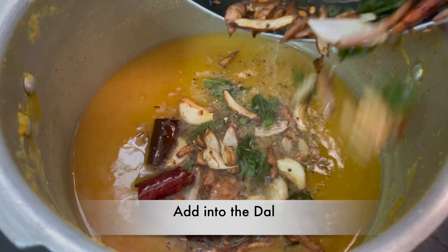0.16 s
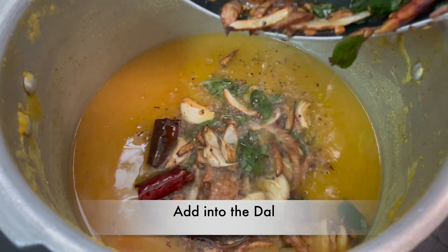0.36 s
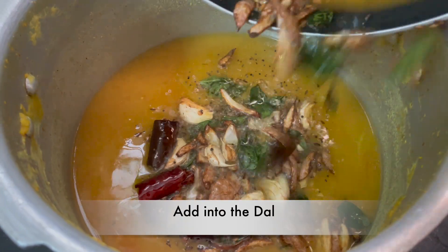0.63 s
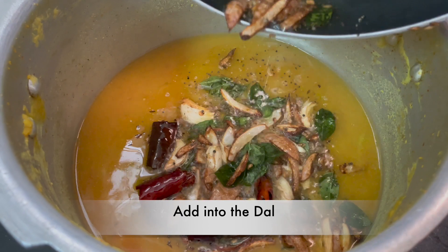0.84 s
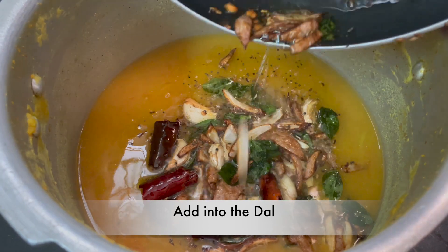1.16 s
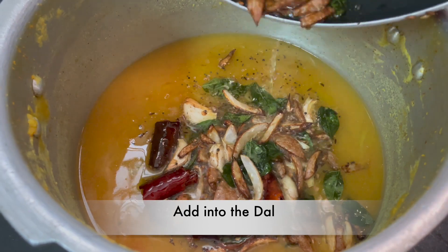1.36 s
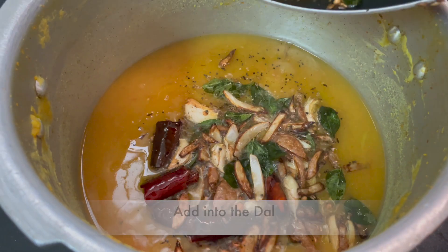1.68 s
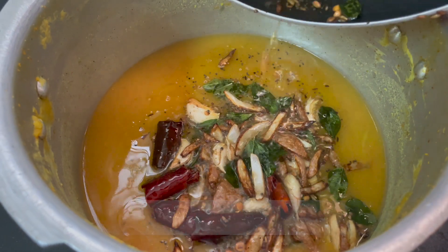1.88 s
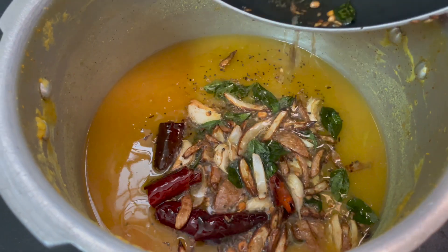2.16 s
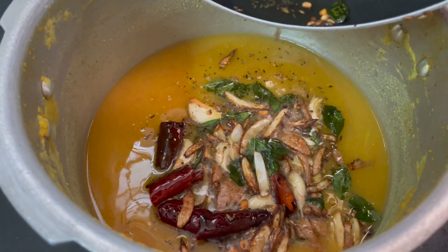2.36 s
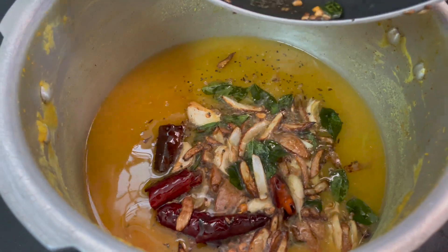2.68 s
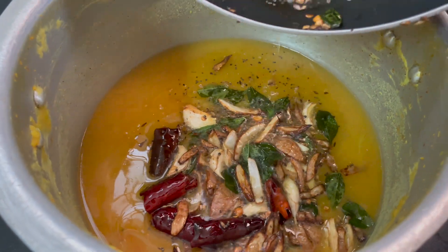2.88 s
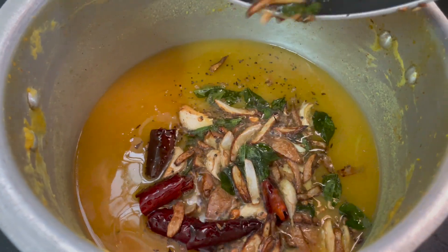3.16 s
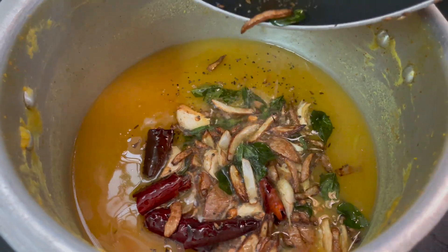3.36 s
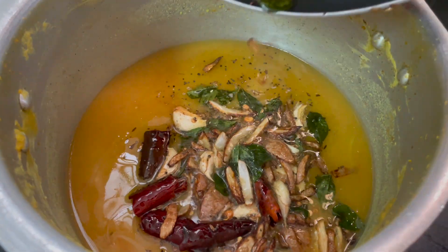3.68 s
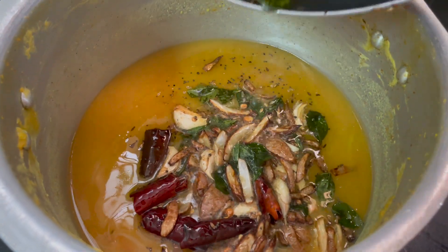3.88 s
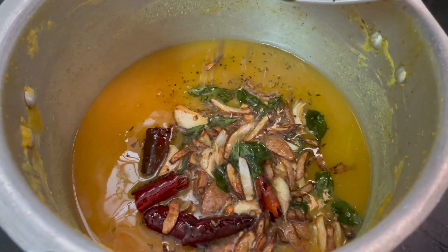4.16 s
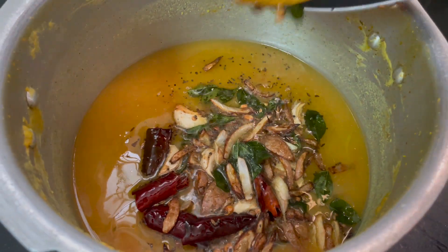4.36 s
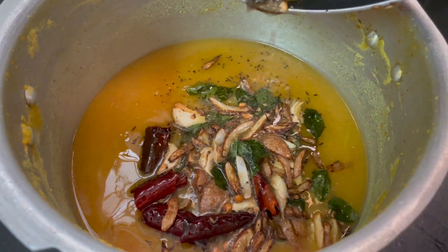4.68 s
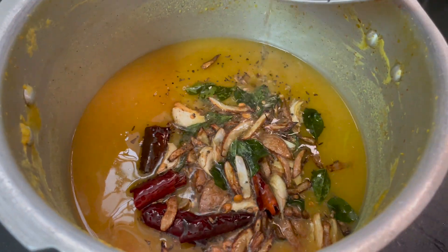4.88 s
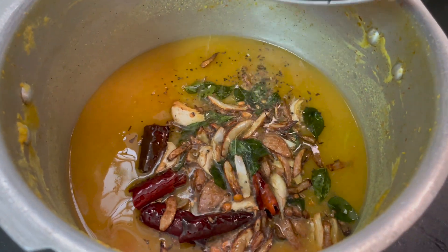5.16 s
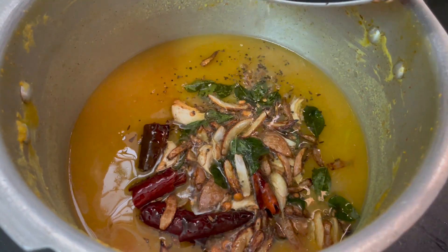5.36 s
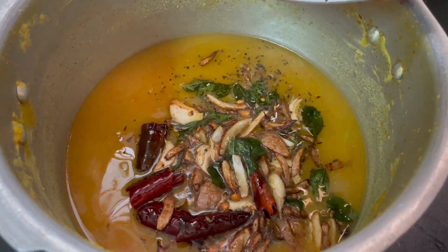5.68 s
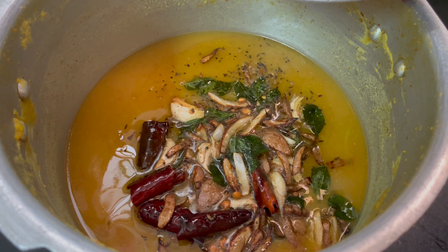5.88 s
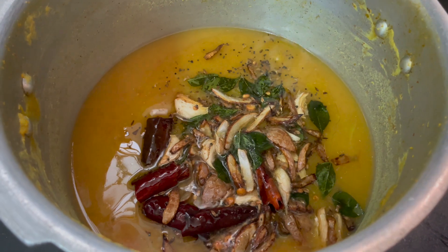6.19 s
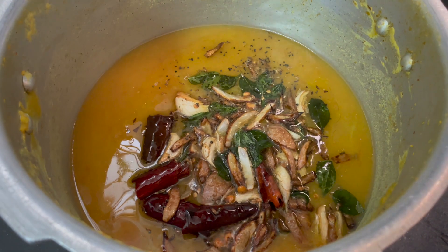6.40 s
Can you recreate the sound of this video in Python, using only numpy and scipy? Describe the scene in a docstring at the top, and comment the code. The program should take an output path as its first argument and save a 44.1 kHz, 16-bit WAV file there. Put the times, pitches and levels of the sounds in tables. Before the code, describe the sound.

Close stereo in a small kitchen with a quiet low rumble. At 0 s hot oil and spices hit soup in a metal pot: a dense, bright, wet sizzle with a bubbling plop, strongest around 0.2 s. Spoon knocks on a small pan come at 0.3, 0.8, 1.2 and 1.35 s, fairly dull and damped; a short scraped ring sounds near 0.65 s. The pouring stops about 1.7 s and the hiss thins to crackle. A softer knock falls at 1.9 s; plops and sputtering flare around 2.4-2.9 s. A hard, bright clack comes at 3.25 s, then knocks at 3.85, 4.2, 4.55, 4.8, 5.2 and 5.5 s, increasingly bright and ringing but short. Tiny sharp oil pops and light taps are scattered between. A small hiss flare rises near 5.1 s; by 6 s only weak crackle and faint taps remain until 6.5 s.

```python
"""Hot spiced oil into soup

Hot oil with fried spices is scraped from a small pan into a metal pot of lentil soup in a kitchen.
Bursting steam bubbles, drawn as filtered random clicks, sizzle densely, thin to a crackle and ring the pot's air.
A spoon knocks on the pan: damped modes plus noise, brighter as the pan empties.
Bubbling plops, and one short scraped ring of the pan near 0.65 s, are rising damped tones with noise;
light taps are short modes with a crack, oil pops short shaped bursts."""
import sys
import numpy as np
from scipy import signal
from scipy.fft import rfft, irfft, next_fast_len
from scipy.io import wavfile

SR = 44100
rng = np.random.default_rng(int(sys.argv[2]) if len(sys.argv) > 2 else 0)


def transcribe(u):
    """Save the signal u as a 16-bit wav file named by the first command-line argument.

    u: samples, shape (n,) or (channels, n), limited to [-1, 1]; the rate is SR.
    q: integer samples, one column per channel.
    """
    v = np.clip(np.atleast_2d(u).T, -1, 1)
    q = np.round(v * 32767).astype(np.int16)
    wavfile.write(sys.argv[1], SR, q)


N = 287973
TIME_S = np.arange(N) / SR

# Frying strength as the oil cools. Each row: time in seconds, level of the hiss in dB.
FRY_HEAT = [(0.0, -23.5), (0.16, -21), (0.5, -26.5), (0.84, -28.5), (1.14, -29.5), (1.52, -32.5),
            (1.55, -38), (1.8, -33.5), (2.07, -37), (2.38, -38), (2.68, -40), (2.86, -38), (3.35, -37),
            (4.13, -42), (4.47, -39.5), (4.6, -44), (4.84, -41.5), (5.13, -36.5), (6.07, -51.5),
            (6.53, -50.5)]
# Spoon blows on the pan. Each row: start in seconds, then in dB: blow, thud, ring, rim modes, base mode,
# edge modes, top modes, hollow, rebound.
SPOON_KNOCKS = [(0.3038, -11.5, -12, -34, 11, 9, 0, 8, 0, -12),
                (0.828, -11, -12.5, -9.5, 3.5, 11.5, 1, 11, 4, -37),
                (1.2179, -11, -13.5, -6, 5, 10, -2, 10.5, -9, -1),
                (1.343, -10.5, -30, -4.5, 2, 0, -1, -5, -8, -11),
                (1.9151, -20, -2.5, -2, 7.5, 7.5, -1, 12.5, 3.5, -10),
                (3.2601, -4.5, -18, -10, 6.5, 3.5, 3, 1, -26, -1),
                (3.8505, -10.5, -10.5, -5, 5.5, 10.5, -4.5, 2.5, -2, -33),
                (4.1834, -16, -3.5, -22, 4, 0, 5, -14, -14, -14),
                (4.569, -10, -0.5, 3.5, -11, -1, -1, -9, 3, -10),
                (4.8074, -9, -3.5, -17.5, 6, 1, 8, 2.5, -7, -1),
                (5.1822, -7, -1.5, 1.5, -16.5, -1, -4.5, 4, 2, -13),
                (5.5277, -5, -1, 2.5, -16, -5, -9, 2, 1, -17)]
# Ringing modes of the pan, before hand and oil smother them. Each row: frequency in Hz, level in dB, t60 in seconds.
PAN_MODES = [(192.6, -33.5, 0.42), (481.6, -20.5, 0.37), (583, -17, 0.32), (717, -21, 0.37),
             (887, -33, 0.11), (1190, -25, 0.16), (1360, -39, 0.077), (1830, -31, 0.15),
             (1042, -14.5, 0.22), (1645, -22, 0.17), (2175, -8, 0.2), (1970, -20, 0.068),
             (2490, -13.5, 0.13), (2530, -21, 0.087), (2836, -12.5, 0.081), (3395, -16.5, 0.047),
             (3680, -28.5, 0.055), (4800, -38, 0.069), (5400, -23, 0.053), (5970, -28, 0.07)]
# Quickly damped modes of spoon and rim. Each row: frequency in Hz, level in dB, t60 in seconds.
CLACK_MODES = [(588, -11, 0.019), (770, -8, 0.037), (1066, -12, 0.044), (1230, -11, 0.019),
               (1650, 1.5, 0.0078), (2006, -9, 0.0073), (2240, -14, 0.02), (2610, -5, 0.0042),
               (2803, -10, 0.015), (3400, -27.5, 0.015), (4700, -20.5, 0.014), (5350, -24.5, 0.017),
               (7260, -14.5, 0.007)]
# Bubbling plops, and one short scraped ring of the pan near 0.65 s.
# Each row: start in seconds, level in dB, pitch in Hz, cluster length in seconds.
PLOPS_AND_SCRAPE = [(0, -10.5, 705, .14), (0.022, -12.5, 1200, 0.065), (0.603, -22, 1830, .02),
                    (0.647, -15.5, 2380, .025), (1.641, -28.5, 407, .02), (2.527, -15.5, 553, .008),
                    (2.546, -18, 720, .015), (2.7, -29, 500, .008), (2.761, -20, 520, .008),
                    (2.781, -24, 560, .015), (2.809, -31, 500, .008), (2.837, -24.5, 695, .05),
                    (2.861, -28.5, 500, .04), (3.438, -29.5, 414, 0.078), (3.633, -25, 583, .008),
                    (3.646, -26, 560, .008), (3.658, -24.5, 1190, .02), (4.033, -29, 563, .008),
                    (4.737, -30, 584, .008)]
# Light taps and spatters. Each row: start in seconds, level in dB, pitch in Hz.
LIGHT_TAPS = [(.81, -16, 2500), (2.277, -19.5, 3620), (3.631, -21.5, 1390), (3.724, -23.5, 3000),
              (4.222, -19.5, 2980), (4.942, -20, 3460), (5.3077, -25, 1220), (5.7573, -17, 2000),
              (6.1095, -30, 1100), (6.12, -27, 2180), (6.1542, -19.5, 2200), (6.36, -29, 2570)]
# Ring of the pan under a light tap. Each row: frequency in Hz, level in dB, t60 in seconds.
TAP_MODES = [(560, -8, 0.025), (1222, -9.5, 0.053), (1530, -22.5, 0.015), (1890, -17, 0.018),
             (2440, -19, 0.04), (3670, -19, 0.012)]
# Loudest pops of oil. Each row: start in seconds, level in dB before POP_DB, pitch in Hz.
OIL_POPS = [(2.2128, -21, 11000), (2.696, -24.5, 10000), (2.7635, -19.5, 10500), (4.008, -25, 9000),
            (4.484, -23.5, 7000), (4.675, -24.5, 5000), (6.0258, -29, 7000), (2.385, -25, 10000),
            (2.477, -26, 4500), (2.631, -30, 3500), (2.842, -27, 4500), (2.885, -25, 9000),
            (3.0092, -22, 10000), (3.1718, -25, 8060), (3.3946, -20, 8050), (3.7625, -22, 5500),
            (3.794, -27, 8000), (4.024, -27, 5200), (4.1264, -27, 5500), (4.4405, -20, 8000),
            (4.5113, -28, 8000), (4.555, -27, 4500), (4.884, -25, 7100), (4.9712, -26, 6000),
            (5.2493, -26, 8000), (5.318, -25, 7100), (5.4882, -24, 7000), (5.8233, -29, 9100),
            (5.957, -36, 8000), (6.169, -32, 7000), (6.213, -31, 6000), (6.3964, -31, 8000),
            (6.439, -33, 6000)]
# Resonances of the air in the pot. Each row: frequency in Hz, width of one filter pass in Hz, level in dB.
POT_MODES = [(509, 167, 9.5), (595, 130, 7), (691, 77, 6), (1191, 222, 6), (1797, 80, -1), (2247, 98, -1),
             (2389, 115, -3), (2750, 310, -10)]
# Spectra of hiss, sputter, kitchen rumble and wall reflections. Each row: frequency in Hz, level in dB.
HISS_SPECTRUM = [(300, -35), (1500, -15), (3000, -12), (5500, -1), (8000, 1.5), (10000, 1.5), (13000, -0.5),
                 (15700, -6)]
SPUTTER_SPECTRUM = [(50, -13), (250, -0.5), (900, -12), (1300, -13), (1550, -7), (2050, -1.5), (2400, -5),
                    (3100, 3.5), (4500, -0.5), (6500, -5), (12000, -1)]
KITCHEN_SPECTRUM = [(20, -36), (40, -11), (65, 0), (110, 3.5), (150, 4), (195, 4), (250, -3.5), (500, -9.5),
                    (1500, -17.5), (8000, -19.5)]
WALL_SPECTRUM = [(60, -12), (300, -1), (2000, 0), (5000, 3), (8000, -8), (14000, -12)]
# Phase difference between left and right. Each row: frequency in Hz, lead of the left in radians.
LEFT_LEAD_RAD = [(0, 0), (900, .3), (1800, 0), (3200, .6), (5200, .3), (6900, -1.1), (7700, -2.9),
                 (8900, -3.4), (10400, -6.1), (12700, -6.5), (13800, -9.1), (16000, -9.6)]
# Level difference between left and right. Each row: frequency in Hz, left minus right in dB.
LEFT_BALANCE_DB = [(100, -1), (500, 1), (1100, 4.5), (1750, 0), (2250, 5), (2750, 3.5), (3300, 3),
                   (5000, 4.5), (7500, -1.5)]
# Fresh oil and spices land and the sizzle flares. Each row: time of the height in seconds, length in seconds,
# more hiss in dB, more sputter in dB.
LANDING_FLARES = [(0.257, 0.11, 0, 4), (2.36, 0.5, 0, 7), (2.55, 0.082, -4.5, 7.5), (3.505, 0.17, -1, 7),
                  (4.272, 0.12, 3.5, 5.5), (5.069, 0.13, 8, 2)]
# Base, edge and top modes of the pan. Each row: centre in Hz, half width at 1/e in Hz.
MODE_FAMILIES = [(1038, 36), (2780, 220), (4500, 1560)]
# Response of the modes to a blow nearer the rim. Each row: frequency in Hz, share of the blow's rim dB.
RIM_RESPONSE = [(500, 0.08), (800, 0.21), (1400, -0.36), (1950, 0.15), (2170, 0.37), (2450, 1.45),
                (2800, 0), (3400, 0.84), (3800, 2), (4600, 0.85)]

SIMMER_DB = -40  # gentle fry, the reference for the layers
# level at a gentle fry; slope in dB per dB of harder frying
HISS_DB, HISS_SLOPE = -39, 0.9
SPUTTER_DB, SPUTTER_SLOPE = -45, 0.86
BUBBLING_DB, BUBBLING_SLOPE = -43.5, 0.59
CRACK_DB, CRACK_SLOPE = -46.5, 0.49  # slope per dB of gained hiss
BUBBLES_PER_S = 4200  # at a gentle fry
SMOOTHING = 0.53  # dB by which the flicker shrinks per dB of harder frying
SPIT_SPREAD_DB = 2.5
HISS_WALL_DB, SPUTTER_WALL_DB = -10, -3
SWARM_DB, SWARMS_PER_S = 3, 60  # bubbles of one size come in brief swarms
POUR_END_S, POUR_STOP_S, POUR_DB = 1.71, 0.044, 3.5  # the stream of oil adds sputter until it stops
COARSE_HZ, COARSE_WIDTH_HZ, COARSE_DB_PER_S = 4740, 1900, -0.79  # coarser hiss dies away first

PLOP_DB, PLOP_POT_DB = -7.5, -21  # heard directly, and through the pot's air
PLOP_SPREAD_OCT, PLOP_GAP_S = 0.25, 0.011  # pitch range and spacing in a cluster
PLOP_T60_S, PLOP_RISE_PER_S = 0.032, 3.3  # ring of one tone; rise as a share of its pitch
PLOP_TICK_DB, PLOP_TICK_HZ = 0, 3140  # wet tick at each onset; dB over its slosh
# broad splash around a tone of this pitch; higher tones ring cleaner
SLOSH_DB, SLOSH_HZ, SLOSH_DB_PER_OCT = -2, 550, -9

# dB per octave, within an octave of TILT_HZ: the pan brightens as it empties
TILT_HZ, FULL_TILT_DB, EMPTY_TILT_DB, EMPTYING_S = 1360, -7, 4.5, 1.9
FULL_RING_S, EMPTY_RING_S = 0.032, 0.14  # hand and oil smother the ring after about this long
HOLLOW_HZ, HOLLOW_WIDTH_HZ = 1526, 710  # between low and high modes; some blows barely reach it
REBOUND_S = 0.00279  # first contact to second
CONTACT_DB, CONTACT_HZ = -8.5, 5500
TAP_DB, TAP_CRACK_DB = 0.5, -2.5
POP_DB = 9
ROOM_T60_S = 0.27
LOW_CUT_HZ, TOP_HZ = 30, 15900


def undb(db):
    """Decibels to gain."""
    return 10 ** (np.asarray(db) / 20)


def unit(x):
    """Scale to rms 1."""
    return x / np.sqrt(np.mean(x ** 2))


def fade(t_s, t60_s):
    """Exponential decay by 60 dB in t60_s."""
    return np.exp(-np.log(1000) * t_s / t60_s)


def add(out, start_s, sound):
    """Mix a sound in at start_s."""
    start = max(int(start_s * SR), 0)
    out[..., start:start + sound.shape[-1]] += sound[..., :N - start]


def spectrum(points, size):
    """Rows of Hz and dB as gains on the bins of a transform."""
    hz, db = np.transpose(points)
    bins_hz = np.fft.rfftfreq(size, 1 / SR)
    return undb(np.interp(np.log(bins_hz + 1), np.log(hz), db))


def colour(x, points):
    """Filter by a spectrum."""
    size = next_fast_len(N + SR // 10)
    return irfft(rfft(x, size) * spectrum(points, size), size)[..., :N]


def band(x, hz, width_hz, order=1):
    """One resonance, gain 1 at the centre; a higher order has steeper skirts."""
    for _ in range(order):
        x = signal.lfilter(*signal.iirpeak(hz, hz / width_hz, fs=SR), x)
    return x


def walk(knots_per_s):
    """Random wander along straight lines between knots, spread near 1."""
    knots = rng.standard_normal(4096)
    return np.interp(TIME_S * knots_per_s, np.arange(len(knots)), knots)


def echoes(x, t60_s, db, gap_s):
    """Dense decaying reflections after a gap, different at each ear."""
    t_s = TIME_S[:SR // 2]
    tail = rng.standard_normal((2, len(t_s))) * fade(t_s, t60_s) * (t_s > gap_s)
    tail /= np.sqrt(np.sum(tail ** 2, axis=1, keepdims=True))
    return undb(db) * signal.fftconvolve(np.atleast_2d(x), tail, axes=1)[:, :N]


def pot_air(x):
    """The air column and cross modes of the pot, as parallel resonances."""
    return sum(undb(db) * band(x, hz, width_hz, order=2) for hz, width_hz, db in POT_MODES)


def bursts(rate_per_s, spread_db, wall_db, count=10):
    """Bursting bubbles, mostly tiny; each size class snaps in its own band and reflects off the pot wall."""
    out = 0
    chance = np.minimum(rate_per_s / count / SR, 1)
    for hz in np.geomspace(2500, 15000, count):
        size_db = spread_db * np.minimum(rng.exponential(size=N), 5)
        size = undb(size_db + SWARM_DB * walk(SWARMS_PER_S))
        # dividing by sqrt(chance) keeps the power steady as the rate changes
        clicks = (rng.random(N) < chance) * size * rng.choice([-1, 1], N) / np.sqrt(chance)
        clicks = 0.25 * clicks + band(clicks, hz, hz / 2) * np.sqrt(7000 / hz)
        out = out + clicks + echoes(clicks, t60_s=0.014, db=wall_db, gap_s=0.0001)
    return unit(out)


def spits(per_s, spread_db, count=1500):
    """Bigger bubbles that crack as noise dying within milliseconds, each with its own colour and size."""
    out, t_s = np.zeros(N), TIME_S[:SR // 50]
    for when, pitch, size, length in rng.random((count, 4)):
        hz = 3000 * 4.6 ** pitch
        start_s = when * count / per_s
        crack = rng.standard_normal(len(t_s)) * fade(t_s, 0.001 + 0.004 * length)
        if start_s < TIME_S[-1]:
            add(out, start_s, undb(spread_db * min(-np.log(size), 2)) * band(crack, hz, hz / 3))
    return unit(out + echoes(out, t60_s=0.0078, db=-45.0, gap_s=0.0004))


def sizzle():
    """One heat drives every layer: as the oil cools, bubbles come more rarely and the hiss breaks into crackle."""
    heat_db = np.interp(TIME_S, *np.transpose(FRY_HEAT)) - SIMMER_DB
    pour = np.clip((POUR_END_S - TIME_S) / POUR_STOP_S, 0, 1)
    hiss_db = HISS_SLOPE * heat_db
    sputter_db = SPUTTER_SLOPE * heat_db + POUR_DB * pour
    for height_s, length_s, more_hiss_db, more_sputter_db in LANDING_FLARES:
        flare = np.exp(-(2 * (TIME_S - height_s) / length_s) ** 2)
        hiss_db = hiss_db + more_hiss_db * flare
        sputter_db = sputter_db + more_sputter_db * flare
    rate_per_s = BUBBLES_PER_S * undb(0.55 * hiss_db)
    flicker = undb(-SMOOTHING * np.maximum(heat_db, 0))

    hiss = unit(colour(bursts(rate_per_s, spread_db=3.0, wall_db=HISS_WALL_DB), HISS_SPECTRUM))
    hiss = hiss * undb(HISS_DB + hiss_db + 3.3 * flicker * walk(60))
    sputter = unit(colour(bursts(rate_per_s, spread_db=2.0, wall_db=SPUTTER_WALL_DB), SPUTTER_SPECTRUM))
    sputter = sputter * undb(SPUTTER_DB + sputter_db + 4.0 * flicker * walk(50))
    cracks = spits(per_s=130, spread_db=SPIT_SPREAD_DB) * undb(CRACK_DB + CRACK_SLOPE * hiss_db)
    big = bursts(rate_per_s * 0.34, spread_db=3.5, wall_db=-8.5, count=3)
    bubbling = unit(pot_air(big)) * undb(BUBBLING_DB + BUBBLING_SLOPE * heat_db + 1.43 * walk(30))

    fizz = hiss + sputter + cracks
    coarse_change = undb(COARSE_DB_PER_S * TIME_S) - 1
    return fizz + coarse_change * band(fizz, COARSE_HZ, COARSE_WIDTH_HZ) + bubbling


def clusters():
    """Rows of s, dB, Hz for the tones of each table row: one at its start, the rest in quick uneven succession."""
    rows = []
    for start_s, db, hz, length_s in PLOPS_AND_SCRAPE:
        rows.append((start_s, db, hz))
        for k, (when, pitch, size) in enumerate(rng.random((24, 3))):
            delay_s = (k + 1 + when) * PLOP_GAP_S
            if delay_s < length_s:
                tone_hz = hz * 2 ** (PLOP_SPREAD_OCT * (pitch - 0.5))
                rows.append((start_s + delay_s, db - 5 * size, tone_hz))
    return rows


def bloops(rows):
    """A short damped tone for each row; it rises like a bubble nearing the surface."""
    out, t_s = np.zeros(N), TIME_S[:SR // 8]
    for start_s, db, hz in rows:
        tone = np.sin(2 * np.pi * hz * (t_s + PLOP_RISE_PER_S * t_s ** 2 / 2))
        onset = 1.17 * (1 - np.exp(-t_s / 0.00034))
        add(out, start_s, undb(db) * tone * fade(t_s, PLOP_T60_S) * onset)
    return out


def splashes(rows, t60_s, focus):
    """A short noise burst for each row, gathered around its pitch; more focus is more tonal."""
    out, t_s = np.zeros(N), TIME_S[:SR // 8]
    for start_s, db, hz in rows:
        noise = rng.standard_normal(len(t_s)) * fade(t_s, t60_s)
        burst = band(noise, hz, min(hz / focus, SR / 3), order=2)
        add(out, start_s, undb(db) * burst / np.abs(burst).max())
    return out


def plops_and_ticks():
    """Plops and the scraped ring: tones with slosh, direct and through the pot's air, and a tick at each onset."""
    tones = clusters()
    sloshes = []
    for start_s, db, hz in tones:
        octaves = max(np.log2(hz / SLOSH_HZ), 0)
        sloshes.append((start_s, db + SLOSH_DB + SLOSH_DB_PER_OCT * octaves, hz))
    plops = bloops(tones) + splashes(sloshes, t60_s=0.034, focus=1.3)
    plops = undb(PLOP_DB) * plops + undb(PLOP_POT_DB) * pot_air(plops)
    tick_rows = [(start_s, db + PLOP_TICK_DB, PLOP_TICK_HZ) for start_s, db, _ in sloshes]
    return plops, splashes(tick_rows, t60_s=0.012, focus=0.6)


def kitchen():
    """Low steady rumble of the room: coloured noise, nearly the same at both ears."""
    noise = rng.standard_normal(N) + 0.22 * rng.standard_normal((2, N))
    return unit(colour(noise, KITCHEN_SPECTRUM)) * undb(-52.0 + 2.8 * walk(16))


def ring(modes, t_s, reach_db):
    """Struck modes at both ears; each radiates in lobes, so it meets the two ears out of step."""
    out, ears = 0, np.array([[1], [-1]])
    for k, (hz, mode_db, t60_s) in enumerate(modes):
        lobe_rad = 0.38 * rng.choice([-1, 1]) * min(hz / 1100, 1)
        gain = (-1) ** k * undb(mode_db + reach_db(hz) + 0.11 * ears)
        out = out + gain * np.sin(2 * np.pi * hz * t_s + ears * lobe_rad) * fade(t_s, t60_s)
    return out * np.minimum(t_s / 0.0005, 1)


def knocks():
    """Each blow clacks, rebounds, rings the pan and thuds; where the spoon lands decides which modes speak."""
    out, t_s = np.zeros((2, N)), TIME_S[:SR // 3]
    for (start_s, db, thud_db, ring_db, rim_db, base_db, edge_db, top_db,
         hollow_db, rebound_db) in SPOON_KNOCKS:
        full = np.exp(-start_s / EMPTYING_S)
        tilt_db = EMPTY_TILT_DB + (FULL_TILT_DB - EMPTY_TILT_DB) * full
        ring_s = EMPTY_RING_S + (FULL_RING_S - EMPTY_RING_S) * full

        def place_db(hz):
            """How strongly this blow reaches a mode."""
            gains_db = (base_db, edge_db, top_db)
            families_db = sum(more_db * np.exp(-((hz - centre_hz) / width_hz) ** 2)
                              for more_db, (centre_hz, width_hz) in zip(gains_db, MODE_FAMILIES))
            near_rim_db = rim_db * np.interp(hz, *np.transpose(RIM_RESPONSE))
            return families_db + near_rim_db + tilt_db * np.clip(np.log2(hz / TILT_HZ), -1, 1)

        clack = ring(CLACK_MODES, t_s, place_db)
        # the pan springs back against the spoon
        rebound = -undb(rebound_db) * np.array([np.interp(t_s - REBOUND_S, t_s, ear) for ear in clack])
        # the whole pan gives way a moment after the contact
        swell = t_s / 0.0019
        thud = undb(thud_db + 0.5) * (swell * np.exp(1 - swell)) ** 3 * np.sin(2 * np.pi * 465 * t_s)
        # a crowd of weak modes blurs into a rough clank
        crowd = rng.standard_normal(len(t_s)) + 1.76 * rng.standard_normal((2, len(t_s)))
        crowd = band(band(crowd * fade(t_s, 0.18), 1040, 1900), 670, 3300)
        crowd = undb(ring_db * 0.21 - 12.5) * crowd
        # the spoon's edge scuffs the metal
        scuff = rng.standard_normal((2, len(t_s))) * fade(t_s, 0.028)
        scuff = band(band(scuff, 4500, 3200), 4700, 4000)
        scuff = undb(rim_db * 0.5 + top_db + tilt_db / 2 - 21.0) * scuff
        # metal meets metal with a sharp tick
        contact = rng.standard_normal(len(t_s)) * fade(t_s, 0.011)
        contact = undb(CONTACT_DB) * band(contact, CONTACT_HZ, 5500)
        ringing = undb(ring_db) * ring(PAN_MODES, t_s, place_db) * np.exp(-(t_s / ring_s) ** 2)
        blow = contact + clack + rebound + ringing + thud + crowd + scuff
        hollow = (undb(hollow_db) - 1) * band(blow, HOLLOW_HZ, HOLLOW_WIDTH_HZ)
        add(out, start_s, undb(db) * (blow + hollow))
    return out


def light_taps():
    """A dry crack and a brief ring of the pan for each light tap; modes far from its pitch speak less."""
    out, t_s = np.zeros((2, N)), TIME_S[:SR // 8]
    for start_s, db, pitch_hz in LIGHT_TAPS:
        ringing = ring(TAP_MODES, t_s, lambda hz: -3.0 * abs(np.log2(hz / pitch_hz)))
        add(out, start_s, undb(db + TAP_DB) * ringing)
    return out + undb(TAP_CRACK_DB) * splashes(LIGHT_TAPS, t60_s=0.017, focus=0.83)


def oil_pops():
    """Sharp pops of oil: noise bursts with a t60 of 5 ms in a broad band."""
    return undb(POP_DB) * splashes(OIL_POPS, t60_s=0.005, focus=0.55)


def spatter():
    """Plops, ticks, taps and pops with the short reflections of the pot."""
    plops, ticks = plops_and_ticks()
    hits = ticks + light_taps() + oil_pops()
    return plops + hits + echoes(hits + plops / 2, t60_s=0.029, db=-4.0, gap_s=0.00097)


def scene():
    """Everything at the pot, with the kitchen walls around it."""
    near = sizzle() + spatter() + knocks()
    walls = echoes(colour(near, WALL_SPECTRUM), t60_s=ROOM_T60_S, db=-9.5, gap_s=0.0075)
    return near + walls + kitchen()


def record(dry):
    """Left and right differ in phase and level; peaks are rounded, deepest bass and top are cut."""
    lead_rad = np.interp(np.fft.rfftfreq(N, 1 / SR), *np.transpose(LEFT_LEAD_RAD))
    # each side takes half the difference
    half = np.sqrt(spectrum(LEFT_BALANCE_DB, N)) * np.exp(0.5j * lead_rad)
    stereo = irfft(rfft(dry) * np.array([half, 1 / half]), N)
    stereo = stereo / (1 + (stereo / 0.95) ** 4) ** 0.25
    stereo = signal.sosfilt(signal.butter(2, LOW_CUT_HZ, "high", fs=SR, output="sos"), stereo)
    return signal.sosfilt(signal.ellip(8, 0.2, 70, TOP_HZ, fs=SR, output="sos"), stereo)


dry = scene()
out = record(dry)
transcribe(out)
```